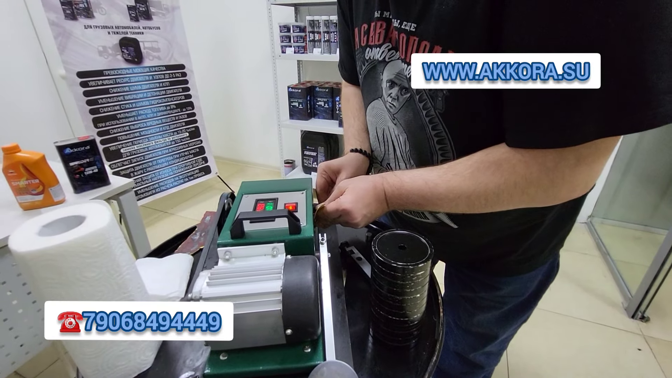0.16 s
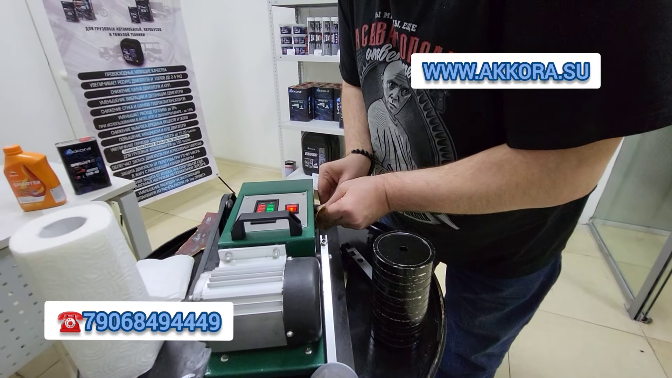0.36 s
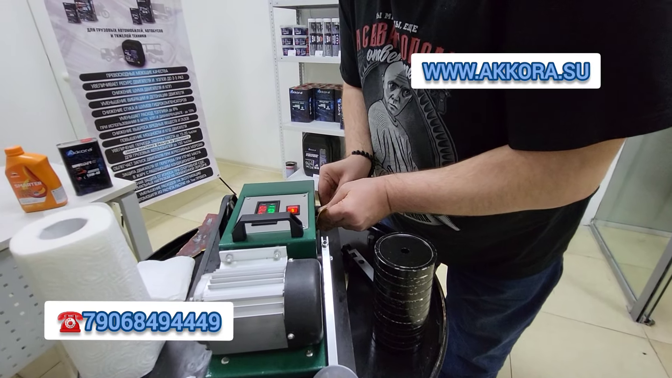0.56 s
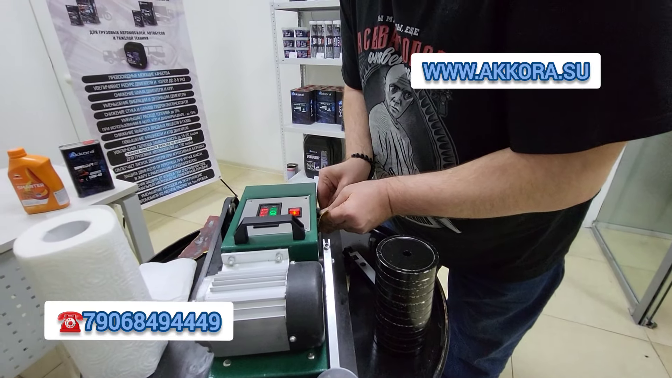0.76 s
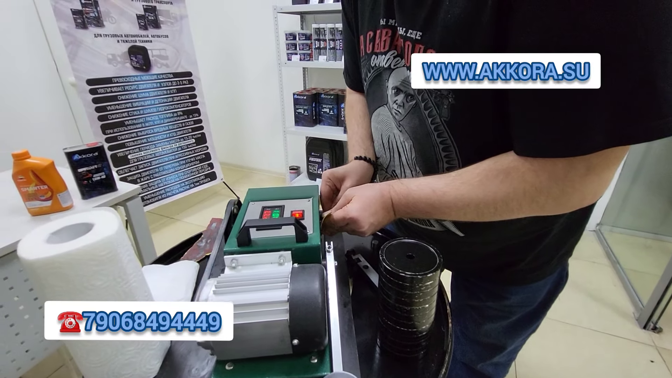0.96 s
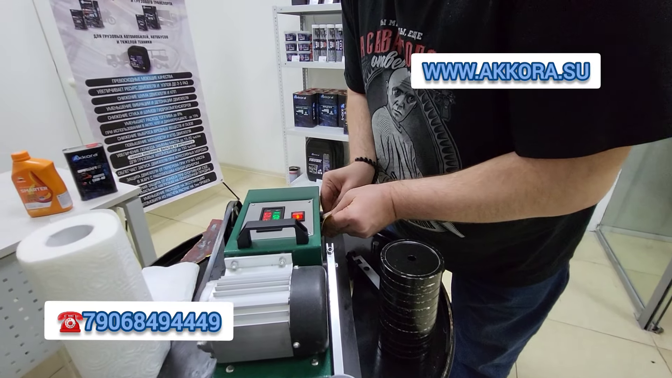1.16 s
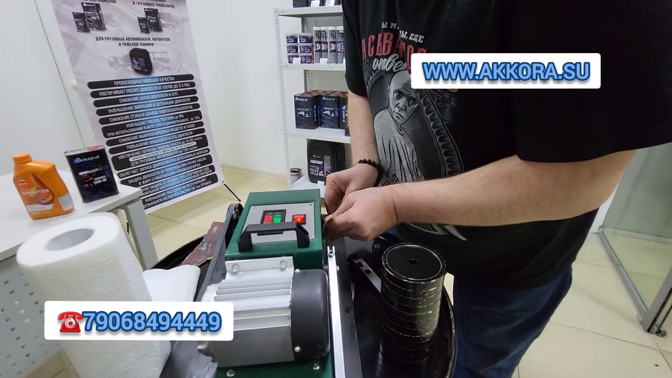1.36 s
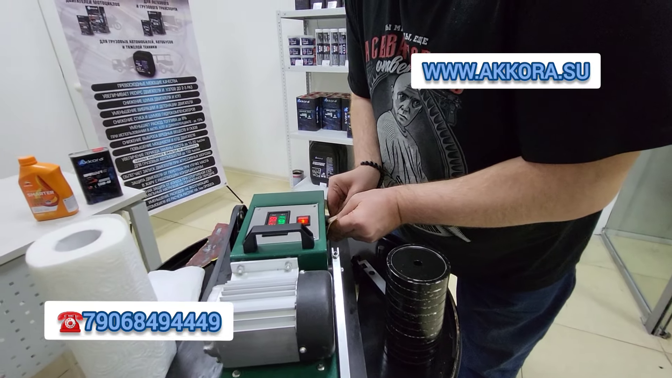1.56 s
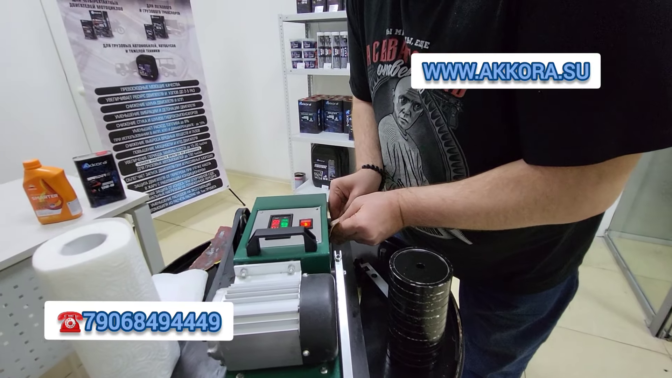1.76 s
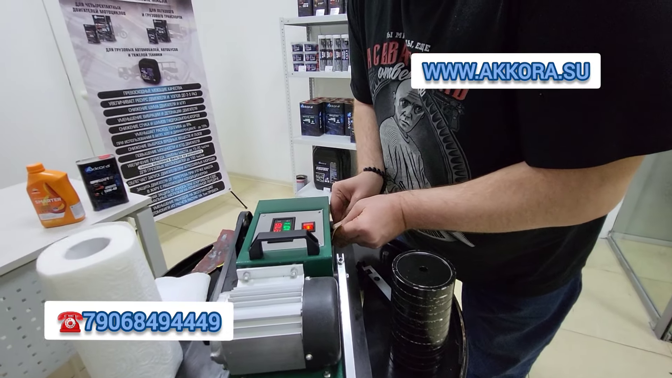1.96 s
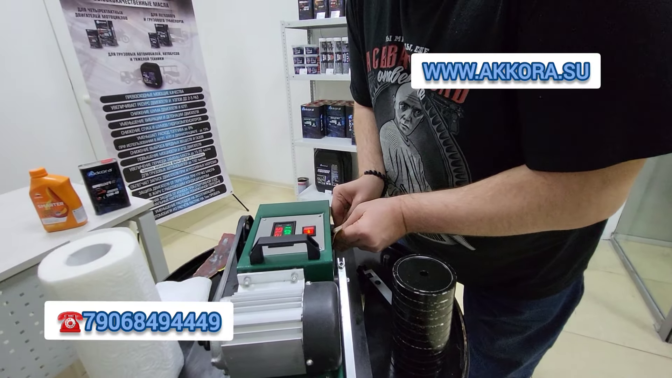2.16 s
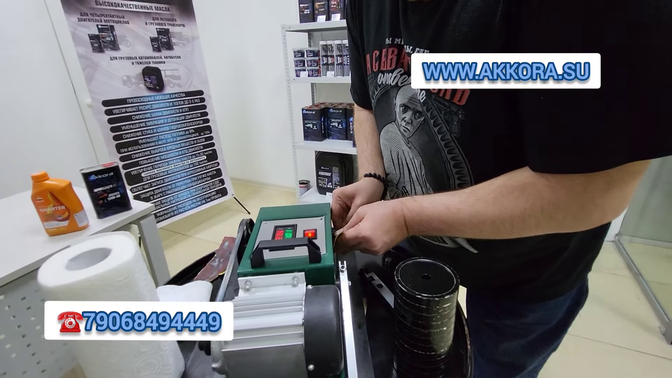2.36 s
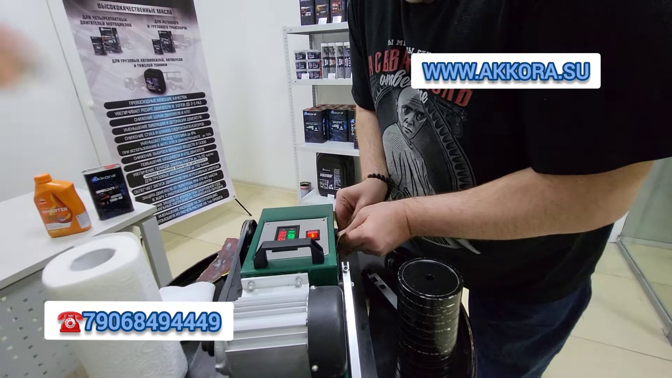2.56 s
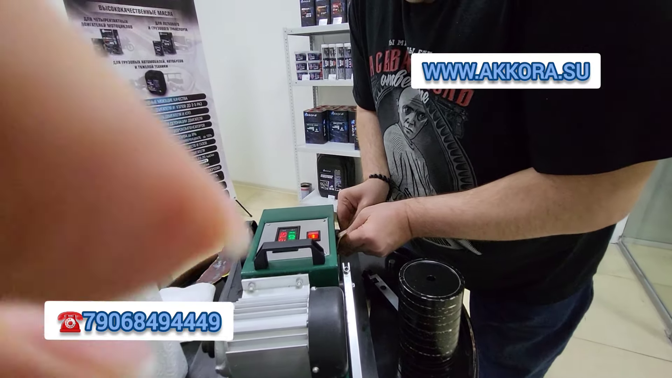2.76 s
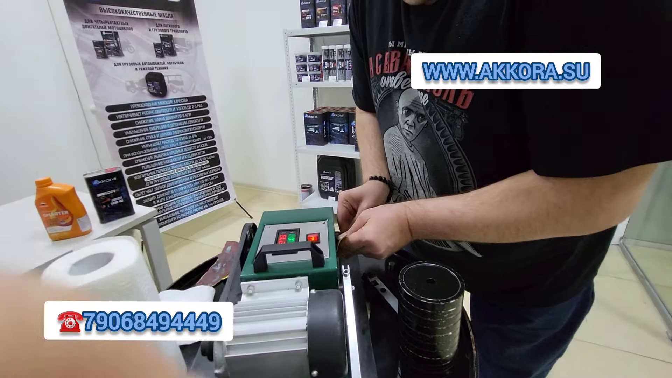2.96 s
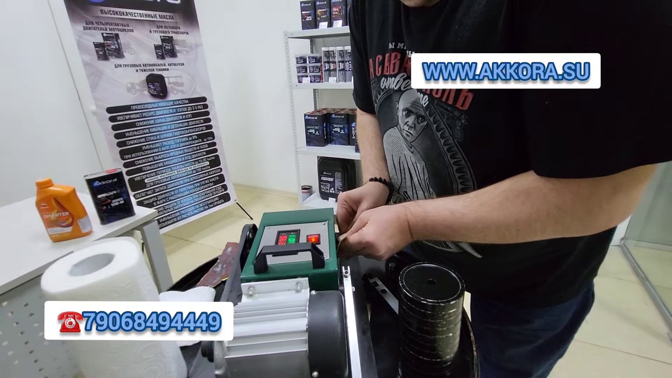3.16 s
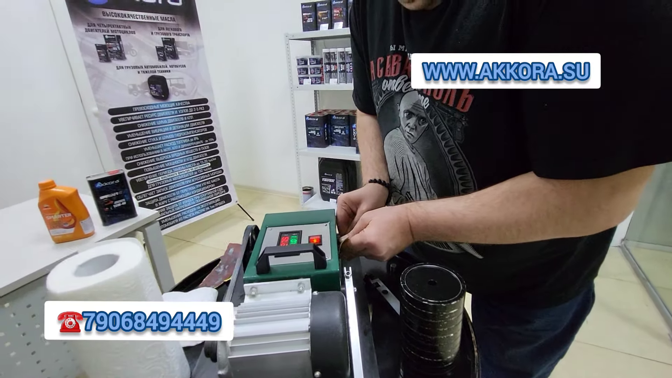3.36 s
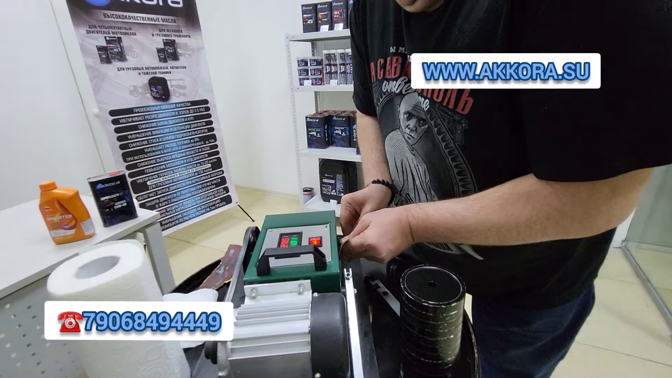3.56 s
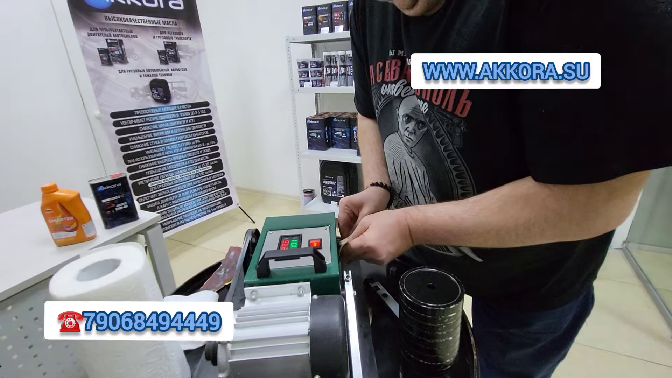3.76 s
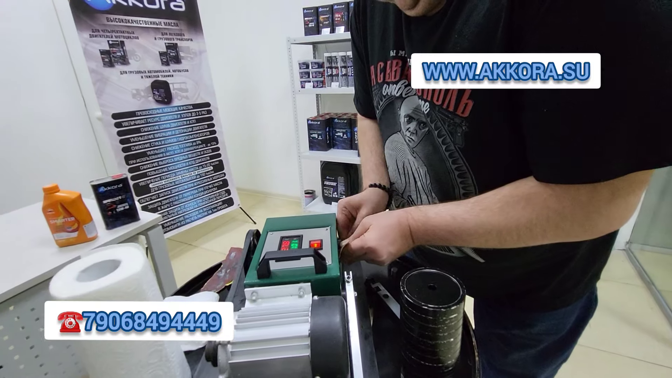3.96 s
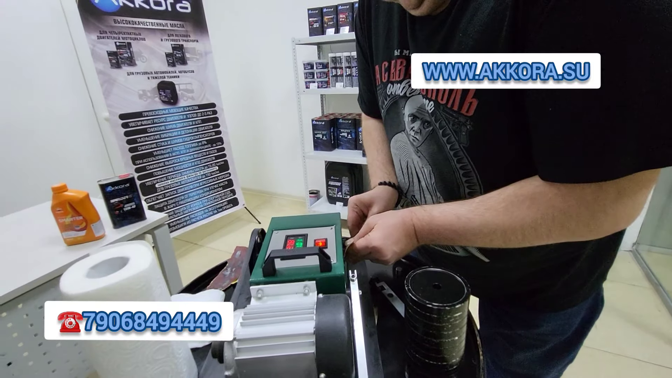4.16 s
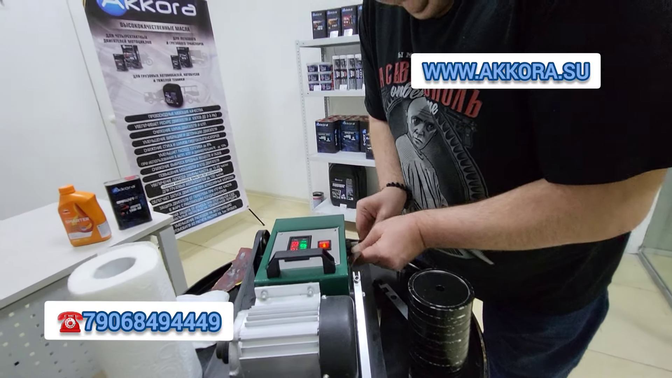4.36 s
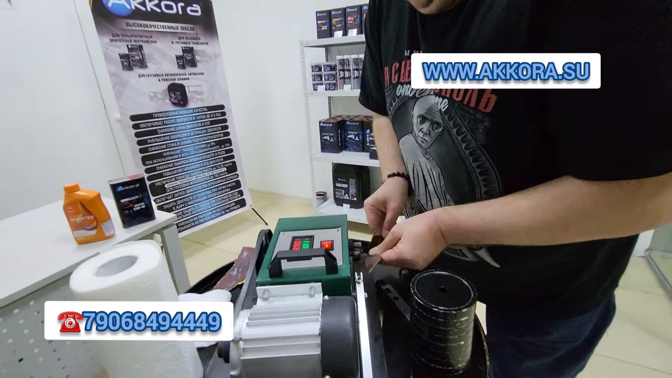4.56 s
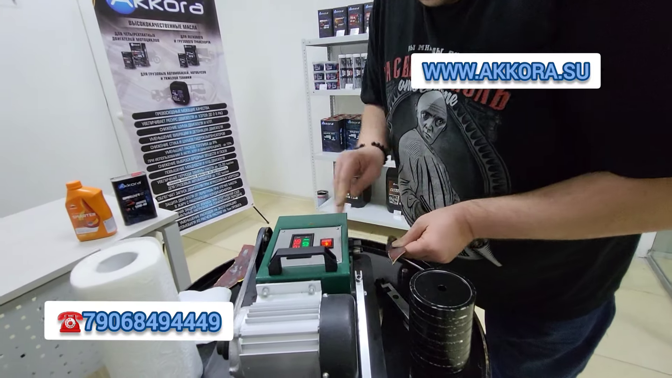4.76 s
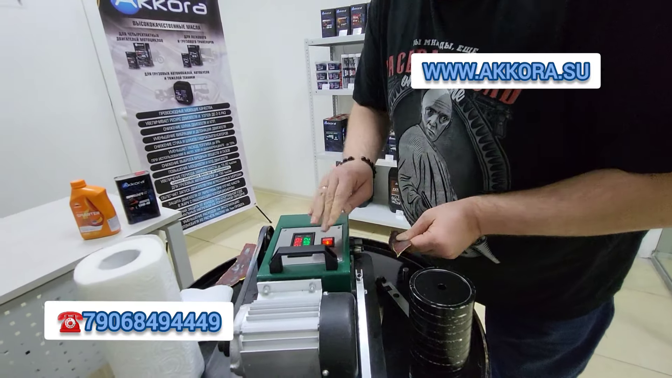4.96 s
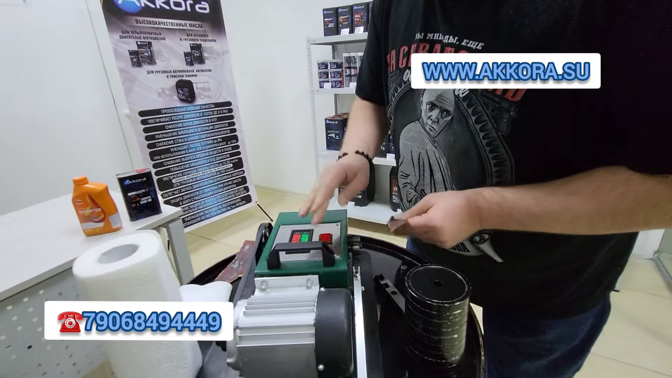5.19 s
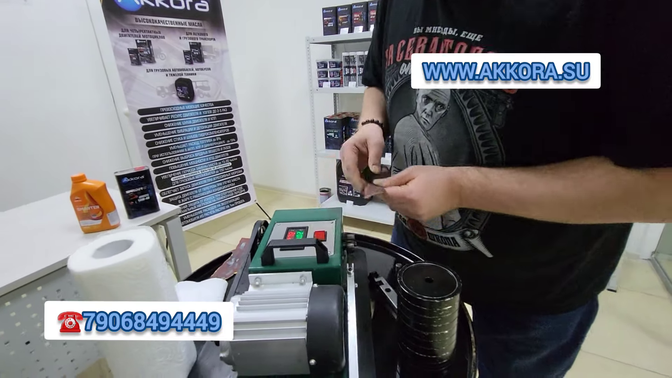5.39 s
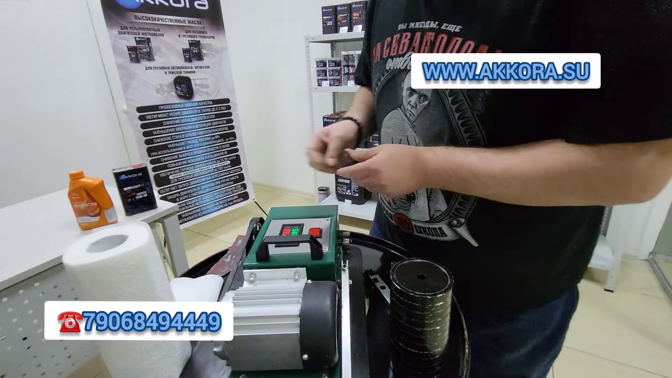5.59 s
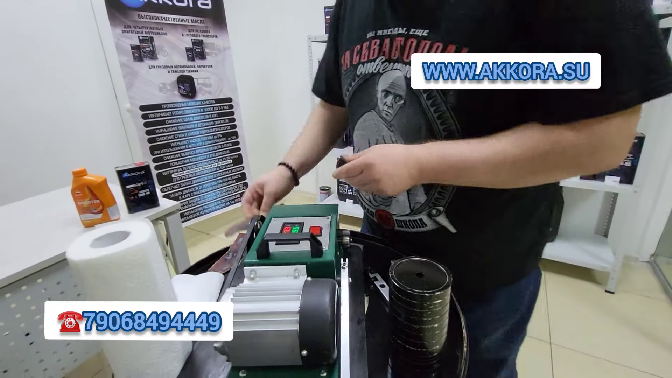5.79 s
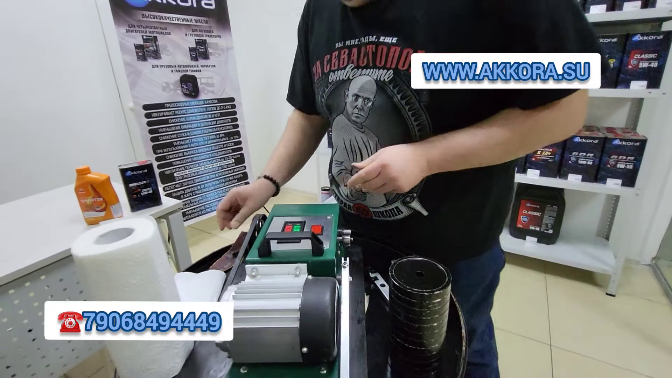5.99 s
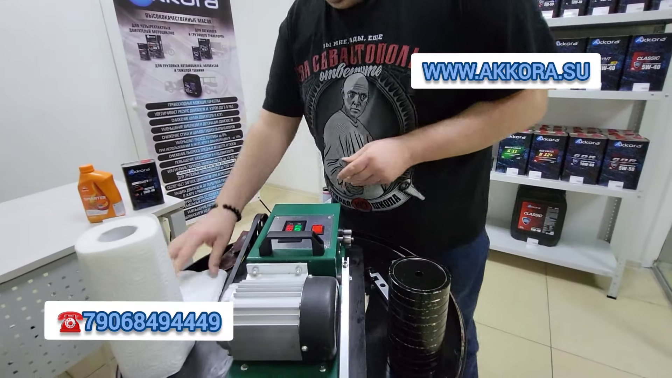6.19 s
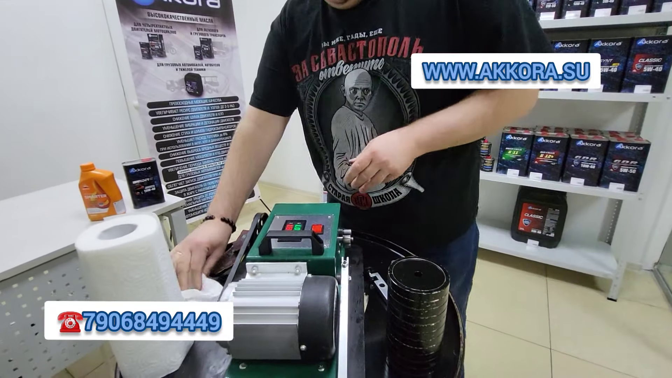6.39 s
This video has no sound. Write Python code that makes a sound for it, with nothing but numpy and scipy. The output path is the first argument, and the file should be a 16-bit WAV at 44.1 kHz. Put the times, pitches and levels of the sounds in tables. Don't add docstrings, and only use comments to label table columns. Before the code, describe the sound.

A metal part rubs against a slow gritty roller driven by a humming bench motor, close to a stereo phone. The dense hiss swells in uneven bites, with ringing squeaky edges, and ends in a rough catch. The motor hums alone for half a second until a button thud and very loud contactor clack. It runs down fast in the short room echo; then faint ticks, a paper brush and a longer rasping slide.

```python
import sys
import numpy as np
from scipy import signal
from scipy.fft import rfft, irfft, next_fast_len
from scipy.io import wavfile
from scipy.ndimage import uniform_filter1d, map_coordinates

SR = 44100
rng = np.random.default_rng(int(sys.argv[2]) if len(sys.argv) > 2 else 0)


def attenuation_scalar(level_db):
    decades = np.asarray(level_db, float) / 20
    return 10 ** decades


def file_out(sig):
    cols = np.atleast_2d(sig).T
    lim = np.clip(cols, -1, 1)
    pcm = np.round(lim * 32767).astype(np.int16)
    wavfile.write(sys.argv[1], SR, pcm)


N = 283541
T = np.arange(N) / SR
ROOM_T60_S = .23
CUP_S, UNCUP_S, GRIP_S = 1.28, 2.67, .05

# low_hz, high_hz, even_pressure_level_db, bite_slope (dB per dB), catch_slope (dB per dB)
RUB_LAYERS = [(130, 410, -52.5, .1, 1.13), (402, 1440, -46, 0.52, 1.16), (1224, 2366, -40.5, .5, 1),
              (2312, 3910, -40.5, 1.03, 0.3743), (3940, 18300, -29, 0.13, 0.22)]
# frequency_hz, width_hz, gain_db
PART_MODES = [(1795, 60, 1), (2120, 120, -8), (1420, 100, -14), (7600, 500, -10)]
# time_s, shading (0-1)
RIGHT_SHADING = [(0, 0), (.6, 0.5), (1.5, 0.6), (2.7, 0.7), (3.3, 0.5), (4.4, 0.3)]
# frequency_hz, gain_db
RUB_LEFT_RESPONSE = [(700, -7.5), (1200, -8.5), (1700, -5), (2600, -0.7), (3200, 2.5), (3800, 0.5),
                     (4400, -0.8), (5500, -2.5), (6000, -7), (7800, -6), (8600, -23), (10000, -15.5),
                     (12500, -15), (15800, -17)]
RUB_RIGHT_RESPONSE = [(700, -16), (1200, -10), (2200, 6.5), (3000, -3.5), (3700, -1.5), (4200, 2),
                      (5000, -9.5), (6500, -4), (7800, -6.5), (9200, -9), (10500, -8.5), (11700, -14.5),
                      (13600, -4.5), (15800, -16.5)]


def rubbing():
    bite_db, catch_db, lift_db, gate = contact()
    grit = rng.standard_normal(N) * attenuation_scalar(1.85 * walk(900))
    near = far = 0
    for lo_hz, hi_hz, even_db, bite_slope, catch_slope in RUB_LAYERS:
        flicker_db = 0.81 * walk(24.945)
        db = even_db + bite_slope * bite_db + catch_slope * catch_db + lift_db + flicker_db
        if lo_hz > 2000:
            db = db + 1.5 * np.exp(-T / 0.58)
        gain = gate * attenuation_scalar(db) * np.sqrt(SR / 2 / (hi_hz - lo_hz))
        near = near + band(gain * grit, lo_hz, hi_hz)
        far = far + band(haze(gain), lo_hz, hi_hz)
    near = near + 0.22 * bite_db * resonance(near, 2525, 200)

    left = near + .5 * late(near, 1.368 + 0.028 * walk(1.64))
    left = left + 0.043 * late(near, 0.657 + 0.069 * walk(1.5))
    right = late(near, 0.377) + .5 * late(near, 1.121 + 0.041 * walk(2.09))
    right = right + 0.43 * late(near, 0.5255 + 0.0027 * walk(1.5))
    both = 0.57 * np.array([left, right]) + .5 * far + 0.62 * room(near)
    modes = sum(attenuation_scalar(db) * resonance(both, hz, width) for hz, width, db in PART_MODES)
    left, right = both + modes

    dip = np.clip(.35 + .4 * step(CUP_S, GRIP_S) + .25 * walk(2.5), 0, .97)
    left = left - dip * band(left, 3630, 3765, order=1)
    right = right - dip * band(right, 3630, 3765, order=1)

    ring_db, echo_ms, share = hand()
    left = colour(left, RUB_LEFT_RESPONSE)
    finger_echo = late(band(left, 1700, 13000, order=1), echo_ms - .02)
    left = (left + share * finger_echo) / np.sqrt(1 + share ** 2)
    left = left + (attenuation_scalar(ring_db) - .6) * resonance(left, 4400, 330)

    shade = np.clip(curve(RIGHT_SHADING), 0, .95)
    right = right - shade * band(right, 4500, 5300, order=1)
    return attenuation_scalar(6.0) * np.array([left, colour(right, RUB_RIGHT_RESPONSE)])


# centre_s, swell_db, length_s
BITE_SWELLS = [(.13, 3.5, .14), (0.495, 3, 0.14), (.75, 4, .1), (.99, 3, 0.13), (1.197, 2.5, 0.12),
               (1.31, 4, 0.045), (1.474, 4, 0.082), (1.69, 5, 0.076), (1.926, 4, 0.076), (2.352, 6, 0.062),
               (2.847, 2.5, 0.12), (3.443, 3, 0.3), (3.98, 3.5, 0.16), (4.25, 5, 0.22), (4.37, 5.5, .04)]
# centre_s, swell_db, length_s
EDGE_CATCHES = [
    (.23, 5, .04),
    (.72, 4, .035),
    (.955, 2.5, .04),
    (3.97, 1, .08),
    (4.22, 3.5, .06),
    (4.349, 10.5, .02),
    (4.37, 4.5, .02),
]


def contact():
    lift_s, lift_db_per_s, graze_db, clear_s = 4.38, 420, -17, 4.52
    lift_db = np.maximum(-lift_db_per_s * np.maximum(T - lift_s, 0), graze_db)
    return bumps(BITE_SWELLS), bumps(EDGE_CATCHES), lift_db, 1 - step(clear_s, 0.0091)


# centre_s, slide_s, echo_delay_change_ms, echo_share, fading_s
FINGER_MOVES = [
    (1.32, 0.041, .16, 0.18, .12),
    (2.4, 0.057, -.28, 0.21, 0.79),
]
# centre_s, swell_db, length_s
GRIP_SHIFTS = [
    (2.85, 5.5, 0.4),
    (4.28, 1.5, 0.25),
]


def hand():
    open_db, cupped_db = 8, 2.5
    cupped = step(CUP_S, GRIP_S) - step(UNCUP_S, GRIP_S)
    echo_ms = .2 + 0.018 * T
    share = 0.17
    for s, slide_s, change_ms, extra, fading_s in FINGER_MOVES:
        echo_ms = echo_ms + change_ms * step(s, slide_s)
        share = share + extra * step(s - 2 * slide_s, GRIP_S) * np.exp(-np.maximum(T - s, 0) / fading_s)
    ring_db = open_db + (cupped_db - open_db) * cupped + bumps(GRIP_SHIFTS) + 0.6 * walk(6.66)
    return ring_db, echo_ms, share


TONE_ORDERS = [(2, 0, 0), (2, 0, 2), (2, 0, 3), (2, 0, 4), (2, 0, 5), (2, 1, 0), (4, 1, 0), (6, 0, 0),
               (8, 0, 0), (10, 0, 0), (12, 0, 0), (18, 0, 0), (20, 0, 0), (-2, 22, 0), (0, 22, 0),
               (0, 22, 2), (2, 22, 0), (6, 22, 0), (8, 22, 0), (0, 23, 0), (10, 1, 0), (18, 1, 0),
               (20, 1, 0), (0, 44, 0), (-6, 66, 0), (-4, 66, 0), (0, 0, 15.22), (2, 0, -1), (2, 0, -2)]
TONE_LEVELS = [-32, -57.5, -51.5, -58.5, -58.5, -60.5, -69, -55.5, -67, -68, -61.5, -64, -64, -61.5, -48,
               -60, -58.5, -58, -54, -56, -62, -53, -64, -53, -63.5, -61, -58.5, -67.5, -66]
# time_s, level_db
HUM_LEVEL = [
    (0.0, -29),
    (0.1, -32.5),
    (3.2, -31.5),
    (5.0, -32.5),
]
# frequency_hz, gain_db
GEAR_COLOUR = [(25, -23.5), (65, -19.5), (110, -6.5), (160, -24), (260, -33), (360, -31.5), (560, -19.5),
               (700, -24), (1050, -9.5), (1600, -24), (2300, -20.5), (3300, -38.5), (8000, -40),
               (9200, -53.5)]
# frequency_hz, width_hz, level_db
GEAR_MODES = [(218, 120, -62), (904, 160, -53.5), (1366, 90, -55), (1850, 80, -62), (5370, 900, -77.5),
              (10900, 3600, -69), (14000, 500, -75.5), (13800, 3500, -72)]


def motor():
    mains_hz, shaft_hz, roller_hz = 50., 24.66, 4.17
    stop_s, coast_s, hum_t60_s, whine_t60_s = 5.048, .9, .4, .14
    after = np.maximum(T - stop_s, 0)
    turns = np.cumsum(np.exp(-after / coast_s)) / SR
    hum_db = curve(HUM_LEVEL)
    throb = 1 + .85 * np.cos(2 * np.pi * 8.66 * (T - .024) + .6 * walk(2.5))
    fade = attenuation_scalar(-60 * after / whine_t60_s)
    tones = np.sqrt(2) * attenuation_scalar(-60.5) * throb * fade * np.sin(2 * np.pi * 4 * mains_hz * T)
    port_lag = np.array([[0], [-.035]])
    starts = rng.random(len(TONE_ORDERS))
    for (mains, shaft, roller), db, start in zip(TONE_ORDERS, TONE_LEVELS, starts):
        hz = mains * mains_hz + shaft * shaft_hz + roller * roller_hz
        dying = attenuation_scalar(-60 * after / hum_t60_s) if hz < 150 else fade
        sway = attenuation_scalar(min(hz / 300, 2.2) * walk(6))
        wave = np.sin(2 * np.pi * (hz * turns + start + port_lag))
        tones = tones + np.sqrt(2) * attenuation_scalar(db) * sway * dying * wave
    tones = tones * attenuation_scalar(hum_db - np.mean(hum_db))

    noise = pair()
    gears = level(colour(noise, GEAR_COLOUR), -42)
    for hz, width, db in GEAR_MODES:
        load = throb ** 0.85 * attenuation_scalar(2.5 * walk(9)) if hz < 300 else attenuation_scalar(1.4 * walk(14))
        gears = gears + level(band(noise, hz - width / 2, hz + width / 2), db) * load
    return tones * attenuation_scalar([[.4], [-.4]]) + ports(gears) * attenuation_scalar(-60 * after / ROOM_T60_S)


# centre_s, level_db, push_ms
CONTACTOR_HITS = [
    (5.0328, -26.5, 3.),
    (5.0459, -18.5, 0.065),
    (5.0466, -3, 0.042),
    (5.048, -2, 0.064),
    (5.0486, -9.5, 0.042),
    (5.0507, -9, 0.055),
    (5.0515, -17.5, 0.11),
]
# frequency_hz, level_db, t60_s
BOX_MODES = [(192.5, -2, 0.21), (219, -9.5, 0.11), (560, -16.5, 0.034), (890, -16, .05),
             (1510, -17.5, .025), (1740, -9, 0.0073), (2240, 7.5, 0.012), (2330, 1, 0.022),
             (2990, -6, 0.014), (4100, -14, 0.0066), (5800, -8, 0.0096), (8940, -10.5, .008),
             (10540, -4, 0.0067)]
# frequency_hz, gain_db
SNAP_ECHO_COLOUR = [(150, 0), (300, -3), (600, -13.5), (900, 2), (1250, -7), (2300, 1.5), (4000, -8.5),
                    (7000, -14.5), (9000, -12), (15800, -17.5)]


def contactor():
    push = np.zeros(N)
    crack = np.zeros(N)
    for s, db, ms in CONTACTOR_HITS:
        u = (T - s) * 1000 / ms
        pulse = np.where(abs(u) < 1, 1 + np.cos(np.pi * np.clip(u, -1, 1)), 0)
        push += attenuation_scalar(db) * pulse / (ms * SR / 1000) ** .5
        crack += attenuation_scalar(db) * (u > 0) * np.exp(-np.maximum(T - s, 0) / 0.00059) * np.exp(-ms / 0.12)
    box = sum(attenuation_scalar(db) * ring(push, hz, t60) for hz, db, t60 in BOX_MODES)
    snap = crack * band(rng.standard_normal(N), 2700, 16000)
    direct = attenuation_scalar(-21.5) * band(box, 180, 14000) + snap

    answer = late(crack, 1.8)
    tail = attenuation_scalar(6) * colour(haze(answer), SNAP_ECHO_COLOUR)
    tail = tail + attenuation_scalar(-4.0) * band(haze(answer, t60=0.67), 100, 600)
    tail = tail + attenuation_scalar(6) * band(haze(answer, t60=0.4), 870, 960)
    tail = tail + attenuation_scalar(-11.5) * band(haze(answer, t60=0.58), 700, 3000)
    return ports(np.array([direct, late(direct, .2)]) + tail)


# start_s, attack_s, hold_s, level_db, release_db_per_s
PAPER_STROKES = [
    (5.646, 0.023, 0.025, -43.5, 280),
    (5.939, 0.08, 0.34, -38, 180),
]
# frequency_hz, gain_db
BRUSHED_PAPER = [(290, -67), (500, -30.5), (569, -20.5), (917, -18.5), (972, -13.5), (1420, -18),
                 (2150, -5.5), (2450, -12), (5830, -19), (15800, -39)]
# frequency_hz, gain_db
SLID_PAPER = [(290, -37), (500, -15.5), (595, -18), (817, -10), (891, -7.5), (931, -8.5), (1420, -4),
              (1920, 0.5), (3090, -10.5), (4240, -11), (8250, -18), (11500, -27.5), (15800, -25.5)]
# frequency_hz, gain_db
BENCH_RUMBLE = [(18, -48), (30, -18), (150, -4.5), (244, -14.5), (289, -5.5), (326, -12), (700, -18.5),
                (910, -20), (1540, -120)]
# centre_s, swell_db, length_s
BENCH_PRESSES = [
    (6.26, 6, 0.083),
    (6.08, -1, .14),
]
# start_s, level_db, low_hz, high_hz, t60_s
SMALL_TICKS = [
    (5.2444, -59, 2000, 6000, .02),
    (5.4774, -59, 3000, 8000, .015),
    (5.5694, -64, 1500, 6000, .015),
    (5.615, -66, 3000, 5500, .12),
    (5.8775, -42, 2500, 7000, .012),
    (5.9168, -34.5, 1400, 3200, .014),
    (5.918, -45, 2520, 2720, .16),
    (5.9415, -41, 40, 140, .13),
    (5.672, -55, 920, 1050, .15),
]


def paper():
    out = 0
    for row, tint in zip(PAPER_STROKES, (BRUSHED_PAPER, SLID_PAPER)):
        start_s, attack_s = row[:2]
        effort = stroke(*row)
        grit = rng.standard_normal(N) * attenuation_scalar(1.3 * walk(600) + 1.5 * walk(40))
        gain = effort / np.std(colour(grit, tint))
        near = gain * grit
        out = out + colour(0.83 * np.array([near, late(near, .3)]) + 1.39 * haze(gain), tint)
        pole = np.exp(-1 / (0.029 * SR))
        bench = signal.lfilter([1 - pole], [1, -pole], effort * attenuation_scalar(-16))
        bench = bench + attenuation_scalar(-58) * step(start_s + attack_s, .02)
        out = out + bench * attenuation_scalar(bumps(BENCH_PRESSES) + 2.2 * walk(25)) * level(colour(pair(), BENCH_RUMBLE), 0)
    ticks = np.zeros((2, N))
    noise = rng.standard_normal(N)
    for s, db, lo_hz, hi_hz, t60 in SMALL_TICKS:
        decay = (T > s) * attenuation_scalar(db - 60 * np.maximum(T - s, 0) / t60)
        ticks += decay * level(band(noise, lo_hz, hi_hz), -2.5) * attenuation_scalar([[1], [-1]])
    return ports(out + ticks + attenuation_scalar(-9) * room(ticks[0]))


def stroke(start, attack, hold, db, release_db):
    held = np.clip((T - start - attack) / hold, 0, 1)
    rise_db = -20 * np.clip(1 - (T - start) / attack, 0, 3)
    sag_db = 2.5 * np.sin(np.pi * held)
    rustle_db = -19
    fall_db = np.maximum(-release_db * np.maximum(T - start - attack - hold, 0), rustle_db)
    return attenuation_scalar(db + rise_db - sag_db + fall_db) * (T > start - 2 * attack)


# frequency_hz, gain_db
AIR_COLOUR = [(15, -38.5), (30, -20), (113, 3.5), (307, -14.5), (403, -11), (769, -32.5), (1430, -26),
              (2030, -21.5), (3130, -29), (5090, -22), (15800, -33)]


def workshop_air():
    air = level(colour(pair(), AIR_COLOUR), -62) * attenuation_scalar(-1.5 + 1.2 * walk(4.3))
    return air + level(band(rng.standard_normal((2, N)), 35, 70), -64)


def room(x):
    noise = pair()
    bass = 0.65 * band(noise, 40, 1200) * attenuation_scalar(-60 * T / .4)
    tail = noise * attenuation_scalar(-60 * T / ROOM_T60_S) + bass
    tail = (tail * np.clip((T - .002) / 0.0039, 0, 1))[:, :SR]
    return signal.fftconvolve(x[None], tail / np.sqrt(np.sum(tail ** 2) / 2), axes=1)[:, :N]


def haze(gain, t60=ROOM_T60_S):
    pole = np.exp(-2 * np.log(1000) / (t60 * SR))
    return pair() * np.sqrt(signal.lfilter([1 - pole], [1, -pole], gain ** 2))


def pair():
    alike_hz = 1150
    shared, left, right = rng.standard_normal((3, N))
    return band(shared, 15, alike_hz) + band(np.array([left, right]), alike_hz, .44 * SR)


# frequency_hz, left_minus_right_db
PORT_DIFFERENCE = [(300, 3), (700, 3.5), (1290, -2), (2380, -5.5), (4400, 9), (8120, -5), (15000, -6.5)]


def ports(x):
    left = colour(x[0], PORT_DIFFERENCE, share=1 / 2)
    right = colour(x[1], PORT_DIFFERENCE, share=-1 / 2)
    return np.array([left, right])


def ring(x, hz, t60):
    pole = np.exp(2j * np.pi * hz / SR - np.log(1000) / (t60 * SR))
    return signal.lfilter([1], [1, -pole], x).imag


def resonance(x, hz, width):
    return band(x, hz - width / 2, hz + width / 2, order=1)


def late(x, ms):
    if np.ndim(ms) == 0:
        return np.roll(x, int(ms * SR / 1000))
    return map_coordinates(x, [np.arange(N) - ms * SR / 1000], order=3)


def walk(rate):
    k = int(SR / rate)
    held = np.repeat(rng.standard_normal(N // k + 1), k)
    return 1.44 * uniform_filter1d(uniform_filter1d(held, k), k)[:N]


def bumps(rows):
    return sum(db * np.exp(-((T - s) / (length / 2)) ** 2) for s, db, length in rows)


def step(s, slew_s):
    return (1 + np.tanh((T - s) / slew_s)) / 2


def curve(table):
    s, value = np.transpose(table)
    return np.interp(T, s, value)


def level(x, db):
    return x * attenuation_scalar(db) / np.sqrt(np.mean(x ** 2))


def colour(x, points, share=1):
    size = next_fast_len(N)
    hz, db = np.transpose(points)
    bins_hz = np.arange(size // 2 + 1) * SR / size
    gain = attenuation_scalar(share * np.interp(np.log(bins_hz + 1), np.log(hz), db))
    return irfft(rfft(x, size) * gain, size)[..., :N]


def band(x, lo_hz, hi_hz, order=2):
    sos = signal.butter(order, [lo_hz, min(hi_hz, .45 * SR)], "band", fs=SR, output="sos")
    return signal.sosfilt(sos, x)


def scene():
    return rubbing() + motor() + contactor() + paper() + workshop_air()


def roll_off(x):
    return signal.sosfilt(signal.butter(12, 16710, fs=SR, output="sos"), x)


# frequency_hz, gain_db
FINAL_TONE = [(20, -1), (12500, 1), (13800, -1), (15800, 5)]


def record(dry):
    top_cut = signal.ellip(10, .2, 60, 15800, fs=SR, output="sos")
    heard = signal.sosfilt(top_cut, colour(dry, FINAL_TONE))
    return roll_off(np.clip(heard, -1, 1))


dry = scene()
out = record(dry)
file_out(out)
```